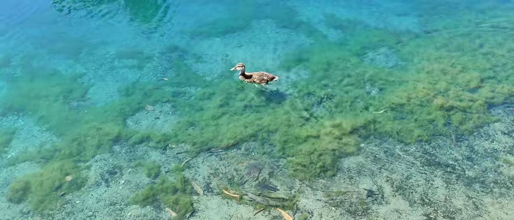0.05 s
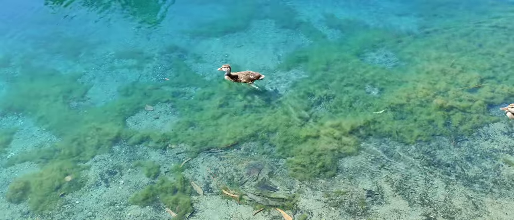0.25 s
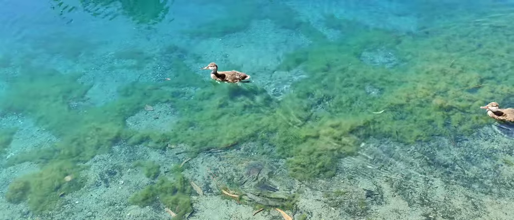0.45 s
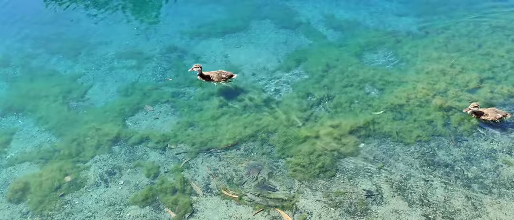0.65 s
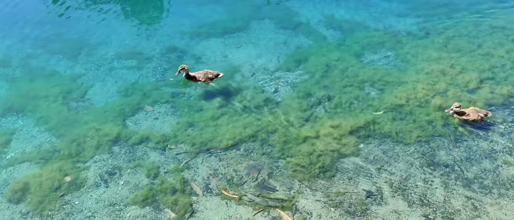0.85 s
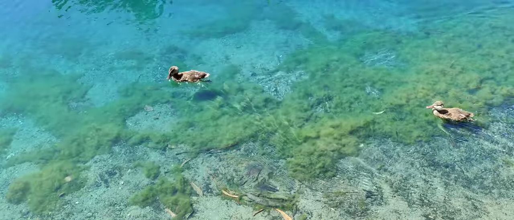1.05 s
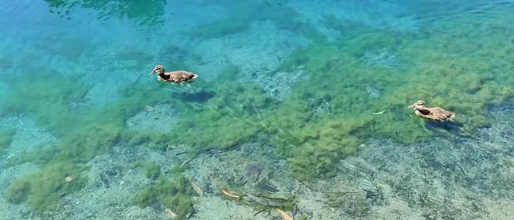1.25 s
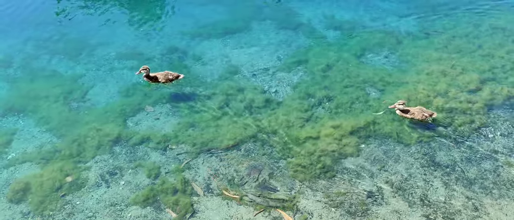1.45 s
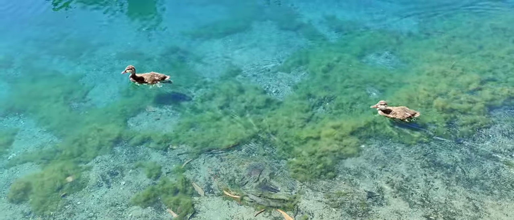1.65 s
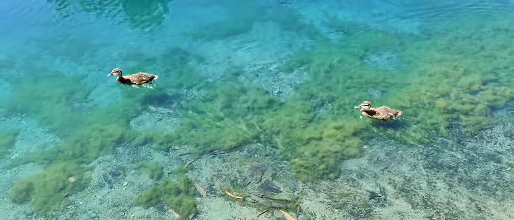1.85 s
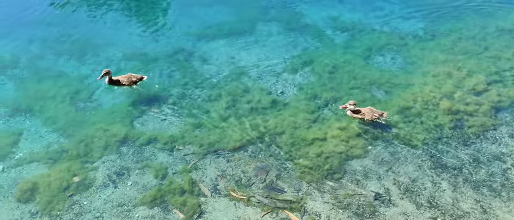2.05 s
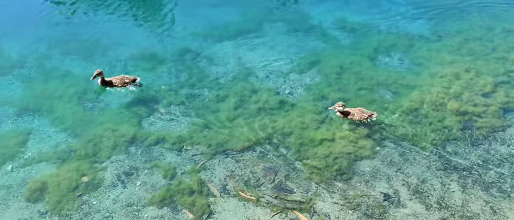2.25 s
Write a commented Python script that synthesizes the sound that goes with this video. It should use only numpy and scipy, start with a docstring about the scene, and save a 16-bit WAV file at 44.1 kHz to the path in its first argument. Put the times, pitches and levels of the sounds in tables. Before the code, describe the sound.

Small birds twitter faintly over a soft wash of water and air, with light wind rumble.

```python
"""A shallow pond, with small birds twittering at a distance over a steady wash of water and air.
Each note is a frequency-modulated whistle, and the banks throw it back as reverberation.
Thin, very high chirps come in pairs, beating and ringing away; one faint tick is heard.
Wind buffets the microphone twice with turbulent pressure and rumbles lightly in between."""
import sys
import numpy as np
from scipy import signal
from scipy.fft import rfft, irfft
from scipy.io import wavfile
from scipy.ndimage import uniform_filter1d

SR = 44100
rng = np.random.default_rng(int(sys.argv[2]) if len(sys.argv) > 2 else 0)


def waveform_to_disk(signal):
    """Save audio, clipped to [-1, 1], as 16-bit WAV at the path in sys.argv[1]."""
    frames = np.transpose(np.atleast_2d(signal))
    scaled = np.clip(frames, -1, 1) * 32767
    samples = np.round(scaled).astype(np.int16)
    wavfile.write(sys.argv[1], SR, samples)


N = 105840

# Fade-in of the whole scene: time_s, gain_db
FADE_IN = [(.1, -75), (.2, -25), (.22, -10), (.3, 0)]
# Spectrum of water and air: frequency_hz, relative_density_db
WASH_SPECTRUM = [(400, -1), (520, -12), (700, -16.5), (1400, -10), (1900, -8), (2450, -8), (3000, -17),
                 (4500, -22.5), (5700, -22.5), (7200, -21.5), (8300, -26.5), (11500, -29), (13500, -26)]
# Likeness of the wash in left and right: frequency_hz, coherence
WASH_COHERENCE = [(280, 1), (500, 0.73), (1000, 0.093), (2000, 0.93), (4000, 0.091), (10000, 0.87)]
# Slow swell of the wash: time_s, gain_db
WASH_ENVELOPE = [(.3, -2), (1.05, 1), (1.8, -1), (2.35, 0)]
# Gusts on the microphone: time_s, level_db
GUSTS = [(.2, -34.5), (.235, -32.5), (.26, -24), (.315, -36.5), (.348, -22.5), (.378, -53.5), (.86, -49.5),
         (1.25, -54.5), (1.38, -43.5), (1.5, -52.5), (1.745, -48.5), (1.775, -33.5), (1.825, -36.5),
         (1.86, -44), (1.97, -38), (2.075, -48.5), (2.108, -31.5), (2.14, -52)]
# Spectrum of the eddies: frequency_hz, relative_density_db
EDDY_SPECTRUM = [(12, -26), (28, -1.5), (48, 2), (68, 3), (100, -2), (145, -15), (200, -38), (1000, -110)]
# Loudness of the farther birds: time_s, level_db
CHORUS_ENVELOPE = [(.25, -69), (.75, -64.5), (.9, -78), (1.4, -64.5), (1.68, -64), (1.85, -77),
                   (2.08, -62.5), (2.4, -76)]
# Reverberation time of the banks: frequency_hz, t60_s
BANK_DECAY = [(1500, 0.19), (4000, 0.59), (7000, 0.66), (11000, 0.57)]
# Gliding notes: start_s, length_s, first_hz, last_hz, relative_level_db
SLURRED_NOTES = [ (0.211, 0.047, 5140, 3700, -64.5), (0.249, 0.04, 5950, 6500, -62.5),
                 (0.272, 0.024, 3195, 4810, -64.5), (0.298, 0.034, 5460, 3500, -63.5),
                 (0.344, 0.044, 4800, 5450, -59.5), (.447, 0.027, 4190, 4290, -49.5),
                 (0.466, 0.019, 4230, 3250, -52), (0.504, 0.0185, 3080, 3402, -51.5),
                 (0.521, .015, 3410, 3020, -49), (0.64, 0.036, 5260, 3900, -57),
                 (0.676, 0.024, 5850, 6600, -59), (.737, 0.03, 4300, 3760, -62),
                 (0.934, .025, 5400, 4250, -72), (1.097, 0.023, 5250, 5030, -61.5),
                 (1.135, 0.017, 4850, 5470, -53), (1.156, 0.025, 4600, 3930, -59.5),
                 (1.274, 0.039, 4670, 4090, -62), (1.314, 0.033, 5400, 4330, -57.5),
                 (1.436, 0.033, 5550, 4600, -60), (1.465, 0.0248, 3980, 4650, -55),
                 (1.489, 0.024, 4500, 3410, -54), (1.517, 0.043, 3283, 3110, -55),
                 (1.536, 0.03, 5540, 6300, -64.5), (1.568, .045, 4680, 4210, -64.5),
                 (1.652, 0.038, 3300, 5430, -61), (1.691, 0.023, 4500, 3730, -65),
                 (1.815, 0.028, 1817, 1660, -52), (1.957, 0.052, 4960, 3650, -65),
                 (2.008, 0.027, 6420, 5830, -63), (2.044, 0.028, 3380, 4300, -66)]
# Quick up-and-down notes: start_s, top_hz, relative_level_db
ARCHED_NOTES = [(0.396, 4130, -58.5), (0.696, 4220, -61.5), (0.782, 4100, -54), (0.807, 4300, -65),
                (1.006, 5450, -64.5), (1.192, 4110, -57.5), (1.730, 4070, -57.5)]
# A lower bird's raspy falling calls: start_s, first_hz, relative_level_db
FALLING_CALLS = [(0.326, 2794, -59.5), (.812, 2680, -58.5), (.888, 2855, -63), (1.055, 2890, -62),
                 (1.603, 2504, -63), (1.955, 2214, -56), (2.212, 2350, -62), (2.299, 2533, -61)]
# Thin ringing chirps: start_s, pitch_hz, relative_level_db, left_minus_right_db
THIN_CHIRPS = [ (.408, 6720, -69, -3), (0.545, 6705, -57, -13), (.595, 6720, -58, -7.5),
               (0.575, 9940, -61.5, 1.5), (.715, 6760, -66.5, 5), (.718, 10080, -68, -2),
               (.800, 6726, -65, -12), (0.973, 6713, -57, -9), (0.971, 10040, -63.5, -4),
               (1.072, 6720, -58, -8), (1.088, 10100, -68, -2), (1.152, 6730, -70.5, -5),
               (1.699, 10050, -65.5, -9.5), (1.745, 6700, -67, 3), (1.861, 10100, -71.5, 1),
               (1.886, 6720, -62, -0.5), (2.069, 10020, -69.5, -4.5), (2.083, 6700, -60.5, -7),
               (2.213, 10060, -68.5, 14), (2.220, 6730, -61, -1)]
# Close partials of each thin chirp: offset_hz, relative_level_db
CHIRP_PARTIALS = [(-48.5, -11.5), (0, 2), (79, -2.5)]


def amp(db):
    """Amplitude ratio: tenfold for every 20 dB."""
    return 10 ** (np.asarray(db) / 20)


def unit(x):
    """Normalisation to rms 1."""
    return x / np.sqrt(np.mean(x ** 2) + 1e-20)


def spectrum_at(points, hz):
    """Interpolation on a logarithmic frequency axis."""
    f, value = np.transpose(points)
    return np.interp(np.log(hz + 1), np.log(f + 1), value)


def envelope(points):
    """Interpolation in decibels gives a gain curve; a moving average rounds its corners."""
    return uniform_filter1d(amp(np.interp(np.arange(N) / SR, *np.transpose(points))), size=400)


def drift(rate_hz, size):
    """Low-pass filtering turns white noise into smooth random motion, rms about 1."""
    f = np.fft.rfftfreq(N, 1 / SR)
    return unit(irfft(rfft(rng.standard_normal(N)) * np.exp(-(f / rate_hz) ** 2), N))[:size]


def band_noise(low_hz, high_hz, size):
    """Band-pass filtering confines white noise to one band, rms 1."""
    band = signal.butter(2, [low_hz, high_hz], "band", fs=SR, output="sos")
    return unit(signal.sosfilt(band, rng.standard_normal(size)))


def ease(length_s):
    """A raised-cosine glide from 0 to 1."""
    return np.sin(np.pi / 2 * np.arange(0, length_s, 1 / SR) / length_s) ** 2


def place(mix, start_s, sound, pan_db=0):
    """Constant-power panning: the level difference, left minus right, sets the direction."""
    sides = unit(amp([[pan_db / 2], [-pan_db / 2]]))
    part = mix[:, max(round(start_s * SR), 0):][:, :len(sound)]
    part += sides * sound[:part.shape[1]]


def water_and_air(level_db=-58, patch_db=4, patch_corner_hz=4250):
    """Partially coherent noise in two channels, its spectrum rising and falling in random patches."""
    frames, hz = N // 256 + 5, np.fft.rfftfreq(1024, 1 / SR)
    a, b, c, d, patches = rng.standard_normal((5, frames, 513)).transpose(0, 2, 1)
    patches = unit(uniform_filter1d(uniform_filter1d(patches, size=8, axis=0), size=12, axis=1))
    coherence = np.clip(spectrum_at(WASH_COHERENCE, hz), -1, 1)[:, None]
    left = a + 1j * b
    right = coherence * left + np.sqrt(1 - coherence ** 2) * (c + 1j * d)
    ripple_db = patch_db * patches / (1 + hz[:, None] / patch_corner_hz)
    spectra = np.array([left, right]) * amp(spectrum_at(WASH_SPECTRUM, hz)[:, None] + ripple_db)
    wash = signal.istft(spectra, nperseg=1024, noverlap=768)[1][:, :N]
    return amp(level_db) * envelope(WASH_ENVELOPE) * unit(wash)


def wind(side_db=-26, flutter_db=-37):
    """Turbulent pressure: eddies push on both channels nearly alike; hard gusts add a higher flutter."""
    shape = amp(spectrum_at(EDDY_SPECTRUM, np.fft.rfftfreq(N, 1 / SR)))
    eddies = signal.hilbert(irfft(rfft(rng.standard_normal((2, N))) * shape, N))
    strength = uniform_filter1d(uniform_filter1d(abs(eddies), size=900, axis=1), size=500, axis=1)
    mid, side = eddies.real / strength ** .75  # evened out, so the gusts govern the level
    gust = envelope(GUSTS)
    rumble = gust * (unit(mid) + amp(side_db) * unit(side) * np.array([[1], [-1]]))
    flutter = amp(flutter_db) * (gust / gust.max()) ** 2 * band_noise(115, 209, N)
    return rumble + flutter


def whistle(hz, wobble=.014, max_wobble_hz=150, edge_s=.004):
    """Frequency modulation: a sine follows a pitch curve and quivers by the rms fraction wobble."""
    t = np.arange(len(hz)) / SR
    quiver = sum(np.sin(2 * np.pi * (max_wobble_hz * rate * t + offset))
                 for rate, offset in rng.random(size=(4, 2))) / np.sqrt(2)
    phase = 2 * np.pi * np.cumsum(hz * (1 + wobble * quiver)) / SR
    edge = np.clip(np.minimum(t, t[-1] - t) / edge_s, 0, 1)
    return np.sqrt(2) * np.sin(np.pi / 2 * edge) ** 2 * np.sin(phase)


def bank_echoes(sound, echoes_per_s=3000, early_s=.02, early_db=2):
    """Scattering from banks and trees: a quick cluster of reflections, then an exponential tail."""
    taps = rng.standard_normal((2, SR)) * (rng.random((2, SR)) < echoes_per_s / SR)
    hz, t, spectra = signal.stft(taps, SR, nperseg=256)
    early = amp(early_db) * np.exp(-t / early_s)
    tail = amp(-60 * t / spectrum_at(BANK_DECAY, hz)[:, None])
    response = signal.istft(spectra * (early + tail), SR, nperseg=256)[1]
    response /= np.linalg.norm(response, axis=1, keepdims=True)
    return signal.fftconvolve(sound, response, axes=1)[:, :N]


def far_chorus(count=160, length_s=.024, low_hz=3594, high_hz=5102, max_bend=.1468):
    """A diffuse field: short random slurs of farther birds arrive only as echo."""
    notes = np.zeros((2, N))
    for k, (when, height, slope) in enumerate(rng.random(size=(count, 3))):
        centre_hz = low_hz + height * (high_hz - low_hz)
        bend = max_bend * (2 * slope - 1) * (2 * ease(length_s) - 1)
        place(notes, (k + when) / count * N / SR, whistle(centre_hz * (1 + bend)))
    return envelope(CHORUS_ENVELOPE) * unit(bank_echoes(notes))


def songbirds(arch_s=.026, arch_depth=.1846, call_s=.046, call_fall=.2, direct_db=-4, echo_db=-1):
    """Direct and reflected sound add: a fast warble and a lower bird's calls, with their echoes."""
    notes = np.zeros((2, N))
    for start_s, length_s, first_hz, last_hz, db in SLURRED_NOTES:
        hz = first_hz + (last_hz - first_hz) * ease(length_s)
        wobble = .09 * abs(np.log(last_hz / first_hz))  # wide slurs quiver, held notes stay pure
        place(notes, start_s, amp(db) * whistle(hz, wobble), pan_db=-12)
    for start_s, top_hz, db in ARCHED_NOTES:
        hz = top_hz * (1 - arch_depth * (2 * ease(arch_s) - 1) ** 2)
        place(notes, start_s, amp(db) * whistle(hz), pan_db=-12)
    for start_s, first_hz, db in FALLING_CALLS:
        hz = first_hz * (1 - call_fall * ease(call_s))
        place(notes, start_s, amp(db) * whistle(hz, wobble=.03), pan_db=-4)
    narrowed = (notes + notes.mean(0)) / 2
    return amp(direct_db) * notes + amp(echo_db) * bank_echoes(narrowed)


def thin_chirps(rise_s=.018, hold_s=.027, t60_s=.59, reference_hz=6900, direct_db=1.5, echo_db=-7):
    """Beating: close, high partials interfere as they swell, hold and ring away."""
    chirps, t = np.zeros((2, N)), np.arange(SR // 2) / SR
    for start_s, hz, db, pan_db in THIN_CHIRPS:
        height = hz / reference_hz
        tone = np.zeros(len(t))
        for offset_hz, partial_db in CHIRP_PARTIALS:
            wander_hz = 48 * height * drift(rate_hz=92.6, size=len(t))
            cycles = rng.random() + np.cumsum(hz + offset_hz + wander_hz) / SR
            tone += amp(partial_db) * np.sin(2 * np.pi * cycles)
        fade_db = -60 * np.maximum(t - hold_s, 0) / t60_s * height ** 1.5  # higher chirps die sooner
        place(chirps, start_s, unit(tone) * np.minimum(t / rise_s, 1) * amp(db + fade_db), pan_db)
    return amp(direct_db) * chirps + amp(echo_db) * bank_echoes(chirps)


def tick(start_s=1.161, level_db=-58, decay_s=.0024):
    """A transient: treble noise with a fast exponential decay is heard as one faint tick."""
    out, t = np.zeros((2, N)), np.arange(SR // 20) / SR
    burst = band_noise(5000, 10000, len(t)) * np.exp(-t / decay_s)
    place(out, start_s, amp(level_db) * burst, pan_db=-4)
    return out


def scene():
    """Superposition: the pressures of birds, water and wind add."""
    return songbirds() + far_chorus() + thin_chirps() + water_and_air() + tick() + wind()


def record(dry):
    """Band limiting: a low-pass filter removes the highest treble after a short fade-in."""
    cutoff_hz = 15550
    low_pass = signal.firwin(511, cutoff_hz, window=("kaiser", 9), fs=SR)
    return signal.oaconvolve(dry * envelope(FADE_IN), low_pass[None], "same")


dry = scene()
out = record(dry)
waveform_to_disk(out)
```